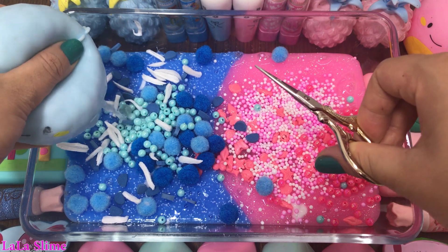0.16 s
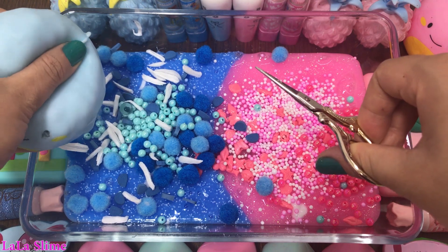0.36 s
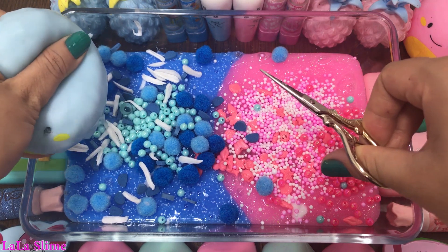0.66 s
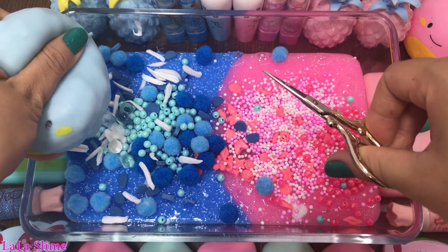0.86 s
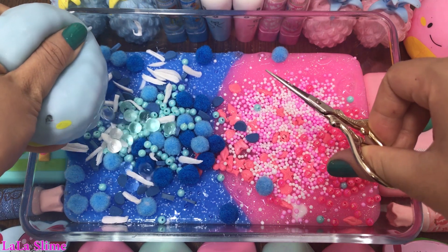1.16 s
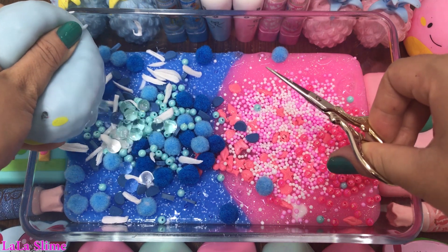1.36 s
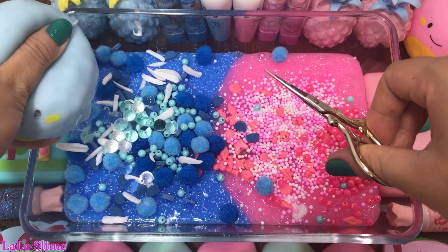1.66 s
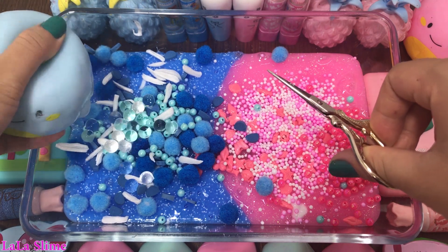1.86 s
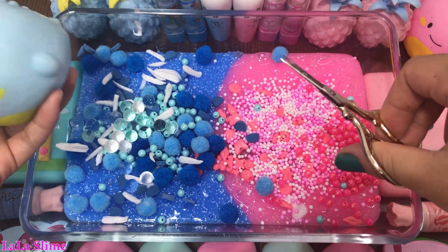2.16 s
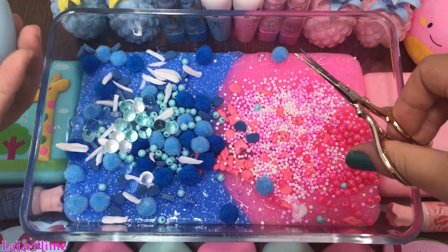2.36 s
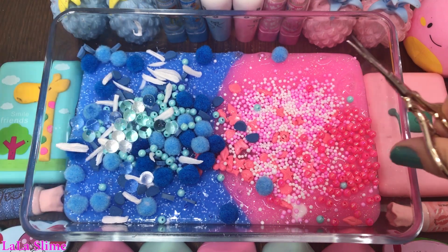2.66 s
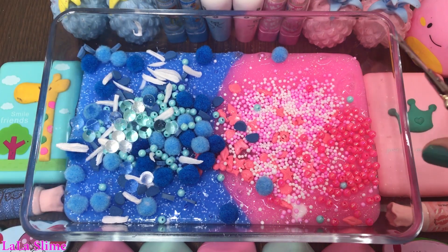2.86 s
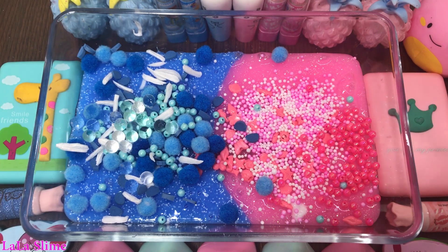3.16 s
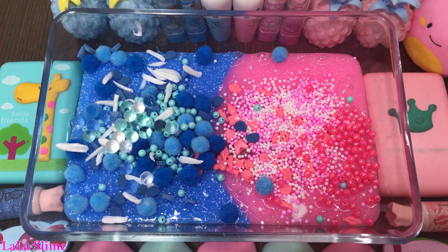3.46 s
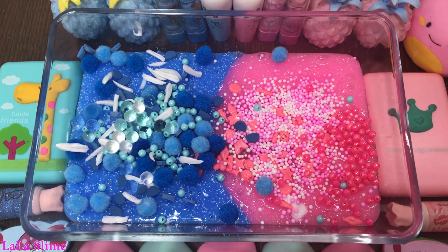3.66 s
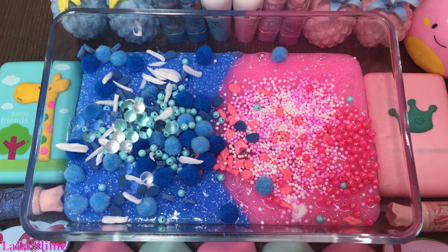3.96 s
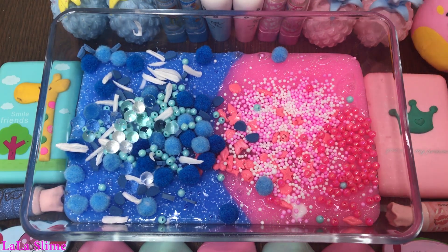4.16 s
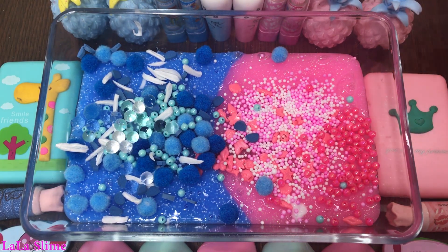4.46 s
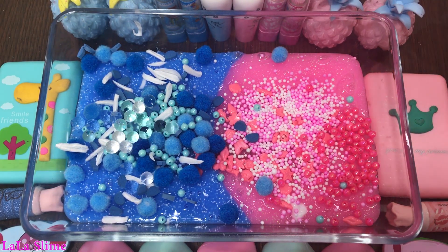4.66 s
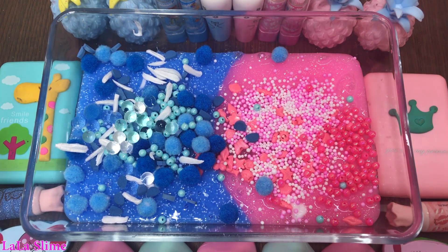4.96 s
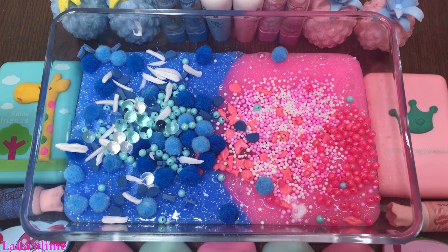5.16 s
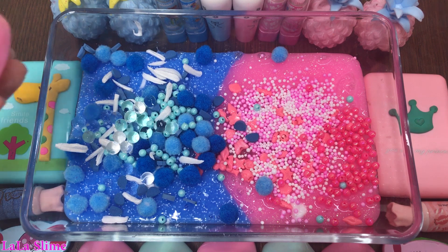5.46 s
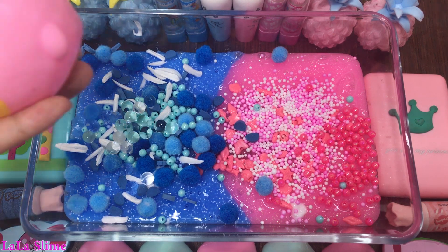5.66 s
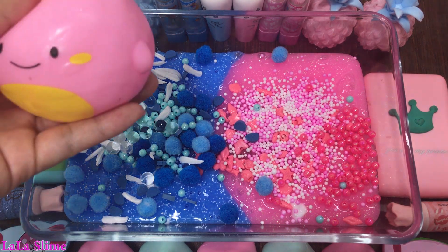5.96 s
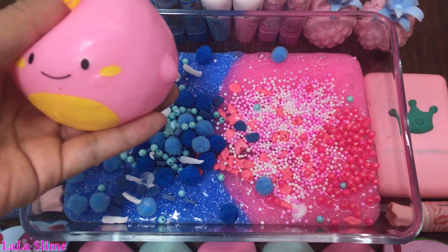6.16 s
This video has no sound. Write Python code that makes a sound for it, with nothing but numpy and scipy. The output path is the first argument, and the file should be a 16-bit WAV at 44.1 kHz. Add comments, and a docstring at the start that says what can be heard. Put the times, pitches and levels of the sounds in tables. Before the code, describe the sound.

A close microphone catches tiny sticky pops and fizzing wet crackle in two main squeezes, thinning out before two seconds. Hands knock softly and skin rustles against foam. Much later, scissors set on a hard tabletop give a light tick, then a hard, much louder clack echoing briefly in the bare room. Quiet hiss and low drone continue to the end.

```python
"""Wet gel beads are squeezed out of a soft toy onto slime, close by in a bare, quiet room.
First the wet film crackles, pops and chirps: noise bursts, tiny sine grains and short rising tones.
Hands bump (damped notes with thuds) and brush things (grainy noise); thin whines of narrow noise are faint.
Near the end metal scissors are laid on the table: a light tap, then a loud clack that rings in the room.
Each blow is a crack plus many fading tones. Soft hiss, rumble and low drones of shaped noise run throughout."""
import sys
import numpy as np
from scipy import signal
from scipy.fft import rfft, irfft, next_fast_len
from scipy.io import wavfile

SR = 44100
rng = np.random.default_rng(int(sys.argv[2]) if len(sys.argv) > 2 else 0)


def transcribe(u):
    """Save the signal u as a 16-bit wav file named by the first command-line argument.

    u: samples, shape (n,) or (channels, n), limited to [-1, 1]; the rate is SR.
    q: integer samples, one column per channel.
    """
    v = np.clip(np.atleast_2d(u).T, -1, 1)
    q = np.round(v * 32767).astype(np.int16)
    wavfile.write(sys.argv[1], SR, q)


N = 277824  # length in samples

# Clearest wet pops: start_s, level_db (before the pops' gain), pitch_hz of the cavity, decay_s
CLEAR_POPS = [(0.1544, -37.5, 3460, .002), (0.1624, -30, 7500, 0.0053), (0.2012, -32.5, 5550, 0.012),
              (0.7695, -36.5, 11300, 0.0057), (0.8105, -41.5, 7200, 0.014), (0.8217, -44, 11000, 0.0077),
              (0.878, -27.5, 9300, 0.002), (0.8825, -29.5, 14100, 0.0049), (0.9138, -37.5, 4200, 0.0046),
              (0.9452, -31, 9000, 0.0046), (0.9783, -20.5, 9500, 0.0045), (1.0366, -25.5, 9350, 0.0054),
              (1.046, -17.5, 9500, 0.0027), (1.0775, -27, 9400, 0.0053), (1.0928, -29, 13300, 0.0018),
              (1.1054, -20, 9900, 0.00053), (1.1345, -23.5, 6900, 0.003), (1.16, -30, 4500, 0.0013),
              (1.2095, -33.5, 7600, 0.0035), (1.3242, -40.5, 7550, 0.0084), (1.3495, -31, 6800, 0.002),
              (1.398, -33.5, 13600, 0.0042), (1.4075, -35, 4180, 0.0014), (1.5575, -32, 7100, 0.0023),
              (1.5625, -35.5, 7300, .005), (1.5882, -26.5, 9100, 0.003), (1.669, -41.5, 4670, 0.0029),
              (2.13, -44, 7000, .002), (2.3702, -44.5, 7300, 0.0013), (2.884, -44.5, 8400, 0.002),
              (3.023, -42, 7140, .0013), (4.1328, -39, 7300, 0.003), (4.6372, -47, 11000, 0.0013),
              (4.6978, -37, 14700, 0.001)]
# Tone of a snapping wet film: pitch_hz, level_db (relative)
FILM_COLOUR = [(200, -31), (700, -6.5), (2000, -1.5), (4500, 3), (9000, 2), (12000, -7), (16000, 1.5)]
# Squeezes of the toy: firmest_s, level_db (before the crackle's gain), swell_s
TOY_SQUEEZES = [(0.198, -61, 0.23), (1.061, -55, .2), (1.57, -62, 0.11)]
# Clearest bubbles, chirping as they open: start_s, peak_db, pitch_hz
CLEAR_BUBBLES = [(0.027, -46, 4710), (0.2022, -36, 6050), (0.265, -46, 4600), (0.293, -47, 5760),
                 (1.123, -32.5, 7000), (1.135, -32.5, 5840), (1.4782, -43.5, 6440)]
# Scissors meeting the table: start_s, ring_db, crack_db, place (0 at the tips to 1 at the handles)
SCISSOR_BLOWS = [(4.3003, -20, -33, 0.1004), (4.3115, -30, -44, .8), (4.3527, -5.5, -8.5, 1)]
# Ringing tones of scissors and table: pitch_hz, t60_s (time to fade by 60 dB),
# tips_db and handles_db (strength when struck there, relative to ring_db)
RING_MODES = [(553, .09, -25, -31.5), (782, 0.029, -17, -19), (993, 0.046, -7.5, -0.5),
              (1097, 0.025, -13, -15), (1360, 0.043, -0.5, -15.5), (1647, 0.027, -22, -7),
              (1871, 0.036, -22.5, -8.5), (2043, 0.12, -18.5, -13.5), (2650, 0.058, -19.5, -23),
              (3110, 0.029, -20.5, -15), (3450, 0.035, -26, -22), (4005, 0.022, -14.5, -16),
              (4770, 0.02543, -15, -16), (5400, 0.01997, -33.5, -24.5), (6360, 0.013, -37, -25),
              (9150, 0.023, -38.5, -22.5), (14100, .012, -33, -26)]
# Tone of metal cracking on the hard top: pitch_hz, level_db (relative)
METAL_COLOUR = [(130, -21.5), (330, -27), (500, -12), (800, -3), (1250, 4), (1700, -6), (3000, -4),
                (5000, -13), (9000, -18), (12000, -26.5), (15000, -27)]
# Soft bumps of hands and things on the table: start_s, level_db (before the bumps' gain), pitch_hz
SOFT_BUMPS = [(0.163, -40, 907), (1.732, -47.5, 966), (1.939, -52.5, 792), (2.104, -52, 720),
              (2.315, -48, 660), (2.3355, -42.5, 694), (3.23, -52.5, 684), (3.999, -53.5, 1315),
              (4.054, -49, 1190), (4.168, -40, 994), (4.371, -30.5, 510)]
# Skin brushing on foam and metal: start_s, level_db, length_s
SKIN_BRUSHES = [(1.694, -62.5, 0.14), (1.837, -69.5, 0.22), (3.214, -65, 0.056), (4.161, -58, 0.082)]
# Tone of sliding skin: pitch_hz, level_db (relative)
SKIN_COLOUR = [(300, -16), (900, -1), (1800, -4.5), (3000, -2), (5000, -7.5), (8000, -9), (16000, -21)]
# Faint thin whines and squeaks: start_s, level_db, pitch_hz, width_hz, length_s
THIN_WHINES = [(2.55, -72.5, 1249, 26.2, 0.45), (4.179, -65, 2920, 350, .12)]
# How long the room's echoes last: pitch_hz, t60_s (time to fade by 60 dB)
ECHO_T60 = [(150, .45), (500, 0.56), (1000, 0.76), (2000, 0.82), (4000, 0.81), (8000, 0.56), (15000, 0.7)]
# Tone of the room's echoes: pitch_hz, level_db (relative)
ECHO_COLOUR = [(150, 0.5), (500, 8), (1000, 0), (2000, 3), (4000, -1.5), (8000, -1), (15000, -6.5)]
# Tone of the room's background noise: pitch_hz, level_db (per Hz, relative)
AIR_COLOUR = [(15, -47.5), (25, -17.5), (40, -8.5), (59, -2), (117, -9), (137, -14), (190, -11), (223, -17),
              (335, -10.5), (394, -16), (560, -20.5), (1230, -25.5), (1840, -30.5), (4500, -34.5),
              (5400, -38.5), (7000, -35.5), (8500, -40.5), (10300, -37.5), (11500, -43.5), (14400, -37),
              (16000, -42.5)]
# Low room drones: pitch_hz, level_db (before the hum's gain), width_hz
LOW_DRONES = [(57.7, -61.5, 7.44), (96.8, -68.5, 7), (108.4, -64, 5.5), (196, -67.5, 17)]

# Above this table level (dB) a pop's dull body falls back, by this many dB per dB
SOFT_POP_DB, BRIGHTEN = -38.5, 0.99
DULL_DB_PER_OCTAVE = 5  # larger, lower cavities have more body
TICK_S = 0.0018  # decay time of each small pop
RELEASE_S = 0.15  # how quickly a squeeze is let go
BUBBLE_HZ, SWELL_S = 5677, 0.0011  # a middling bubble: its pitch and swell time
AIR_DB = -60.5  # background noise before its gain
EDGE_HZ = 16000  # the final treble limit


def pops(rows, gain_db, film_db, body_db):
    """A film snaps: broad crackle, the short ring of a small cavity, and a dull body clearest in soft pops."""
    out = np.zeros(N)
    for s, db, hz, decay in rows:
        snap = burst(decay, spikiness=0.8, snap=0.5)
        f = bins(snap)
        cavity = peak(f, hz, width_hz=hz / 6.5)
        film = amp(film_db + read(FILM_COLOUR, f))
        loud_cut_db = BRIGHTEN * max(db - SOFT_POP_DB, 0)
        small_cut_db = DULL_DB_PER_OCTAVE * np.log2(hz / BUBBLE_HZ)
        body = amp(body_db - loud_cut_db - small_cut_db) * peak(f, hz=1317, width_hz=1700) ** 2
        pop = coloured(snap, np.hypot(cavity + film, body))
        add(out, s, sized(pop, db + gain_db, decay))
    return out


def small_pops(body_db):
    """Lesser films break at random, each a short dry tick."""
    rows = scattered(top_db=-36.5, spread_db=19, low_hz=5060, high_hz=13000, count=50)
    ticks = [(*row, TICK_S) for row in rows]
    return pops(ticks, gain_db=-10.5, film_db=-11, body_db=body_db)


def bubbles(gain_db, rise_per_s):
    """Each bubble swells into a short note that climbs as its cavity shrinks; faint ones open at random."""
    out, t = np.zeros(N), np.arange(SR // 40) / SR
    faint = scattered(top_db=-46, spread_db=6.5, low_hz=4800, high_hz=8140, count=22)
    for s, db, hz in [*CLEAR_BUBBLES, *faint]:
        swell = SWELL_S * (BUBBLE_HZ / hz) ** 2  # larger, lower bubbles swell more slowly
        envelope = t / swell * np.exp(1 - t / swell)
        turns = hz * (t + rise_per_s * (t - swell) ** 2 / 2)
        add(out, s, amp(db + gain_db) * envelope * np.sin(2 * np.pi * turns))
    return out


def crackle(gain_db, per_s=1200, count=24):
    """Countless tiny bubbles burst between the beads while the toy is squeezed."""
    t, fizz = np.arange(256) / SR, np.zeros(N)
    for hz in np.geomspace(3200, 14500, count):
        strength = amp(np.minimum(4 * rng.exponential(1, N), 12))
        clicks = strength * (rng.random(N) < per_s / count / SR)
        grain = unit(np.sin(2 * np.pi * hz * t) * np.exp(-t * hz / 2))  # a couple of cycles
        fizz += signal.oaconvolve(clicks, grain)[:N]
    return amp(gain_db) * unit(fizz) * squeeze(np.arange(N) / SR)


def squeeze(s):
    """Strength of the squeezing at times s: each squeeze swells and is let go."""
    total = 0
    for at, db, swell in TOY_SQUEEZES:
        pace = np.where(s < at, swell, RELEASE_S)
        total = total + amp(db) * np.exp(-((s - at) / pace) ** 2)
    return total


def scattered(top_db, spread_db, low_hz, high_hz, count, follow=0.47):
    """Random (s, dB, pitch Hz) rows that come thicker and louder the harder the toy is squeezed."""
    when, size, pitch = rng.random((count, 3)).T
    s = np.arange(0, N, 64) / SR
    chance = np.cumsum(np.sqrt(squeeze(s)))
    # even steps through the summed chance fall close together in time during a squeeze
    at = np.interp((np.arange(count) + when) / count, chance / chance[-1], s)
    firmness_db = 20 * np.log10(squeeze(at) / squeeze(s).max() + 1e-9)
    db = top_db + follow * firmness_db - spread_db * size
    return np.transpose([at, db, low_hz * (high_hz / low_hz) ** pitch])


def scissors():
    """Near ring and chattering crack of the blows, plus a room wash fed by the ring and one clean pulse each."""
    ring = table_ring(rise_s=0.00049)
    wash = room(ring, wet_db=-12) + room(contact(chatter_s=0), wet_db=-8.5)
    ring_out = np.interp(np.arange(N) / SR, [4.79, 4.81], [1, 0.1])  # the wash drops to a tenth
    return ring + contact(chatter_s=0.003006, snap=0.57) + wash * ring_out


def table_ring(rise_s):
    """Each blow sets many fading tones ringing; where it lands sets their shares."""
    out, t = np.zeros(N), np.arange(SR // 4) / SR
    for s, ring_db, _, place in SCISSOR_BLOWS:
        for k, (hz, t60, tips_db, handles_db) in enumerate(RING_MODES):
            # neighbouring tones start in opposite directions
            mode = (-1) ** k * np.sin(2 * np.pi * hz * t) * np.exp(-np.log(1000) * t / t60)
            share_db = tips_db + place * (handles_db - tips_db)
            add(out, s, amp(ring_db + share_db) * mode * (1 - np.exp(-t / rise_s)))
    return out


def contact(chatter_s, snap=1, seconds=0.001):
    """Metal hits the hard top; the blades chatter for a moment, or give one pulse if chatter_s is 0."""
    out = np.zeros(N)
    for s, _, crack_db, _ in SCISSOR_BLOWS:
        if chatter_s:
            crack = burst(chatter_s, spikiness=0.3, snap=snap)
        else:
            crack = signal.unit_impulse(SR // 16)
        crack = coloured(crack, amp(read(METAL_COLOUR, bins(crack))))
        add(out, s, sized(crack, crack_db, seconds))
    return out


def bumps(gain_db, t60, thud_db, rise_s):
    """Padded knocks: one damped note and a short thud around its pitch."""
    out, t = np.zeros(N), np.arange(SR // 8) / SR
    for s, db, hz in SOFT_BUMPS:
        thud = burst(decay=0.01, spikiness=0.17)
        thud = coloured(thud, peak(bins(thud), hz, width_hz=0.684 * hz) ** 2)
        knock = np.sin(2 * np.pi * hz * t) * np.exp(-np.log(1000) * t / t60) * (1 - np.exp(-t / rise_s))
        add(knock, 0, sized(thud, thud_db, 0.009))
        add(out, s, amp(db + gain_db) * knock)
    return out


def brushes(grain):
    """Brief swishes of skin sliding over a surface: noise made grainy by uneven slips."""
    out = np.zeros(N)
    for s, db, length in SKIN_BRUSHES:
        slips = rng.standard_normal(SR) * np.exp(grain * rng.standard_normal(SR))
        swish = unit(coloured(slips, amp(read(SKIN_COLOUR, bins(slips)))))
        stroke = np.hanning(int(length * SR))
        add(out, s, amp(db) * stroke * swish[:len(stroke)])
    return out


def whines():
    """Narrow bands of noise, heard as unsteady tones that fade in and out."""
    out = np.zeros(N)
    for s, db, hz, width, length in THIN_WHINES:
        noise, stroke = rng.standard_normal(SR), np.hanning(int(length * SR))
        tone = coloured(noise, peak(bins(noise), hz, width) ** 2)
        add(out, s, amp(db) * stroke * unit(tone[:len(stroke)]))
    return out


def room(x, wet_db, gap_s=0.0027):
    """Dense reflections from hard walls, after a short gap, each band dying at its own speed."""
    hz, t, z = signal.stft(rng.standard_normal(SR), SR, nperseg=256)
    fade = np.exp(-np.log(1000) * t / read(ECHO_T60, hz)[:, None])
    z = z * fade * amp(read(ECHO_COLOUR, hz))[:, None]
    tail = signal.istft(z, SR, nperseg=256)[1][:SR]
    tail = tail * (np.arange(SR) / SR > gap_s)
    return amp(wet_db) * signal.fftconvolve(x, tail / np.linalg.norm(tail))[:N]


def background(air_db, hum_db):
    """Steady hiss and rumble with a few wavering low drones, all shaped from one random noise."""
    size = 2 * next_fast_len(N // 2 + 1)
    f = np.fft.rfftfreq(size, 1 / SR)
    rumble_cut = 1 / np.sqrt(1 + (46 / (f + 1)) ** 14)  # cuts steeply below about 46 Hz
    air = amp(AIR_DB + air_db) * unit(amp(read(AIR_COLOUR, f)) * rumble_cut)
    hum_power = 0
    for hz, db, width in LOW_DRONES:
        drone = unit(peak(f, hz, 2 * width) ** 2 * rumble_cut)
        hum_power = hum_power + (amp(db + hum_db) * drone) ** 2
    return irfft(rfft(rng.standard_normal(size)) * np.sqrt(air ** 2 + hum_power), size)[:N]


def burst(decay, spikiness, snap=0, size=2048):
    """A single-sample snap at the head of a dying crowd of uneven micro-clicks."""
    t = np.arange(size) / SR
    crowd = rng.standard_normal(size) * np.exp(spikiness * rng.standard_normal(size) - t / max(decay, 1e-4))
    return crowd / np.linalg.norm(crowd) + snap * signal.unit_impulse(size)


def coloured(x, gain):
    """Filter with the given gain at each frequency that never sounds early, so attacks stay sharp."""
    log_gain = np.log(np.maximum(gain, 1e-5))
    circle = np.concatenate([log_gain, log_gain[-2:0:-1]])
    response = np.exp(np.conj(signal.hilbert(circle))[:len(gain)])  # minimum phase
    return irfft(rfft(x) * response, len(x))


def peak(f, hz, width_hz):
    """Gain of one resonance at frequencies f."""
    return 1 / np.sqrt(1 + ((f ** 2 - hz ** 2) / (width_hz * f + 1)) ** 2)


def sized(x, db, seconds):
    """Gives x the energy of a sound of that level and length."""
    return x * amp(db) * np.sqrt(abs(seconds) * SR / np.sum(x ** 2))


def amp(db):
    """Decibels to gain."""
    return 10 ** (np.asarray(db) / 20)


def unit(x):
    """Scales x to an rms (average strength) of 1."""
    return x / np.sqrt(np.mean(x ** 2) + 1e-20)


def read(points, hz):
    """Reads a table between its points along a log-frequency axis."""
    f, value = np.transpose(points)
    return np.interp(np.log(hz + 1), np.log(f + 1), value)


def add(mix, s, sound):
    """Mixes a sound in at time s, in place."""
    part = mix[max(round(s * SR), 0):][:len(sound)]
    part += sound[:len(part)]


def bins(x):
    """Frequencies of the spectrum of x."""
    return np.fft.rfftfreq(len(x), 1 / SR)


def scene():
    """Adds the wet sounds, handling and scissors with their room echoes, then the whines and background."""
    wet = pops(CLEAR_POPS, gain_db=-12.0, film_db=-10.5, body_db=-0.5) + small_pops(body_db=2)
    wet = wet + bubbles(gain_db=0.0, rise_per_s=5.9) + crackle(gain_db=-4)
    handling = brushes(grain=0.79) + bumps(gain_db=-2, t60=0.035, thud_db=-10, rise_s=0.0011)
    echoes = room(wet, wet_db=-12) + room(handling, wet_db=-8.5)
    mix = wet + handling + echoes + scissors() + whines()
    return (mix + background(air_db=-0.5, hum_db=-3.5))[None]


def record(dry):
    """A steep filter removes the treble above EDGE_HZ."""
    low_pass = signal.firwin(511, EDGE_HZ, window=("kaiser", 9), fs=SR)
    return signal.oaconvolve(dry, low_pass[None], "same")


dry = scene()
out = record(dry)
transcribe(out)
```